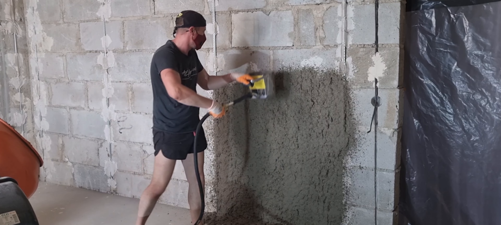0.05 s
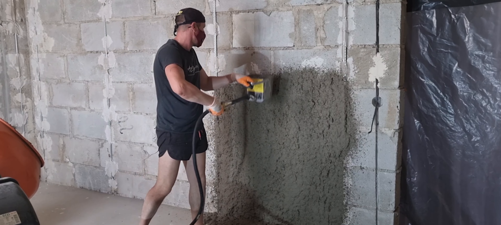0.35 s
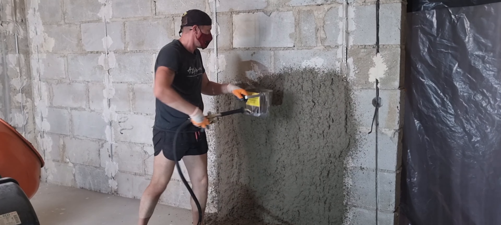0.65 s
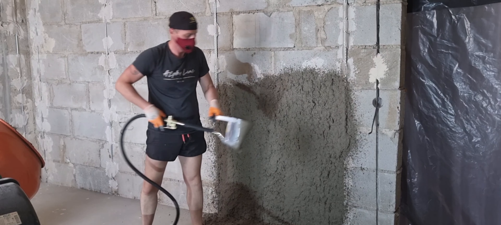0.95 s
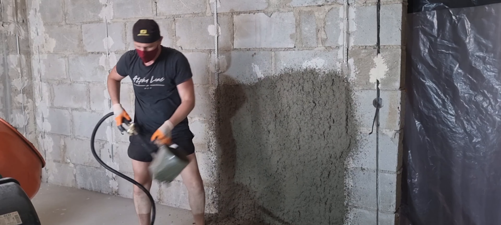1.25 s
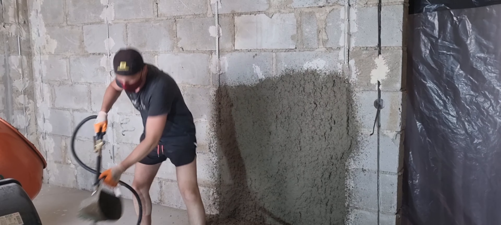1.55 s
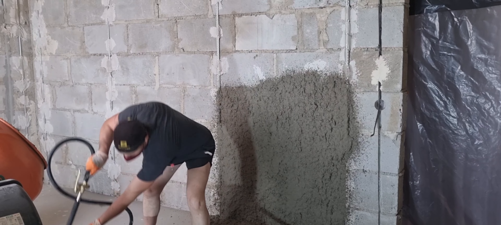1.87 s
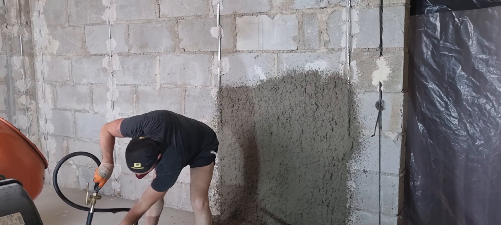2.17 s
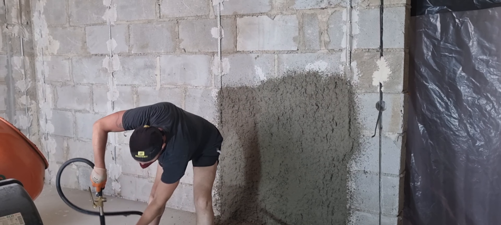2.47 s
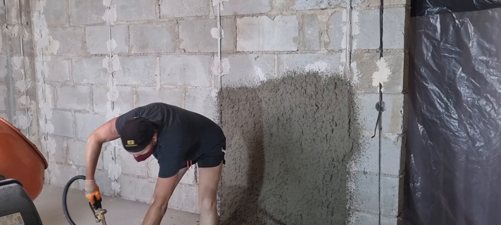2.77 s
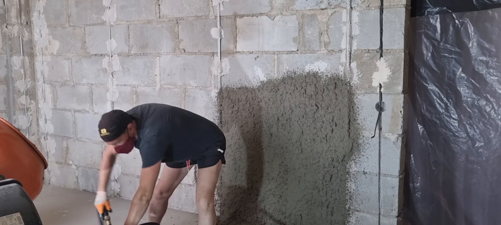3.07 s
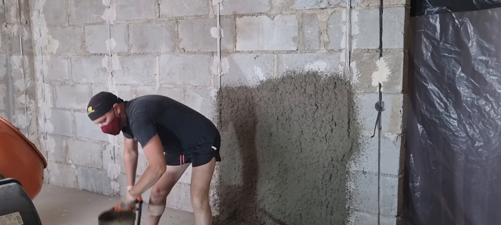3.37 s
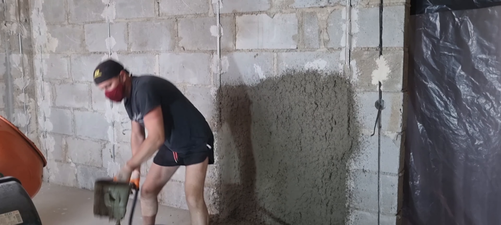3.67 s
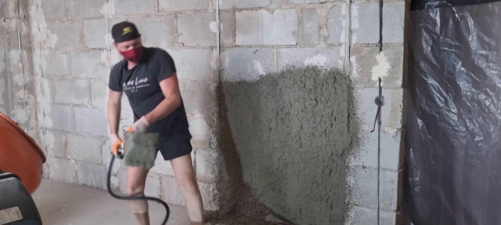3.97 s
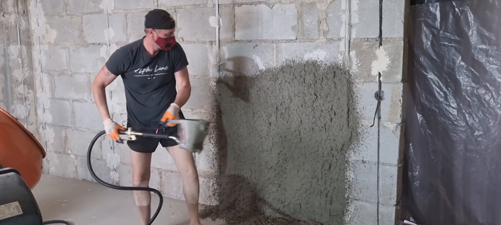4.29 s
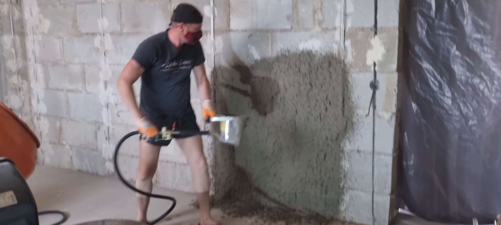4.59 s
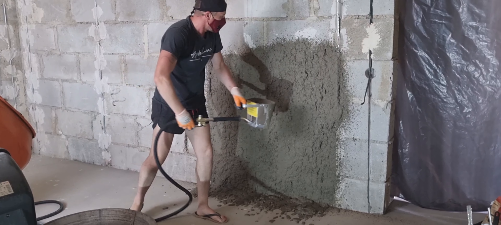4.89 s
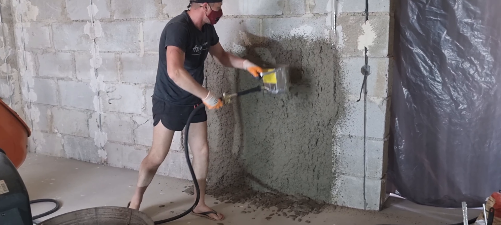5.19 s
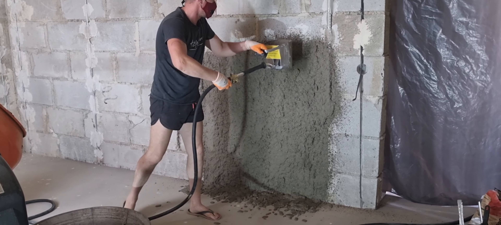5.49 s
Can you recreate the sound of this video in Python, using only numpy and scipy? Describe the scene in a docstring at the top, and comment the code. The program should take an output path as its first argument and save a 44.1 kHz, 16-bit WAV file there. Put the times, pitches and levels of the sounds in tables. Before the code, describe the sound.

In a bare, slightly echoing room, a plaster sprayer hisses loudly and dies away within a second. Faint scuffs lead into wet, sandy scraping and a few hollow knocks as the steel hopper is refilled from a tub. Shoes shuffle over grit and a hose fitting gives a bright clink. Then the spray bursts back, fuller and boomier than before. Everything sounds fairly near and a little louder on the left.

```python
"""A loud, sputtering hiss: an air-driven hopper gun sprays mortar on a block wall in a bare room.
The gun runs empty and is shut off. The worker scoops its steel hopper (the cup that holds the
mortar) through a tub, and wet sand grinds on the rim. The hopper comes out with a ringing knock,
fittings clink, shoes shuffle over the gritty floor, and the refilled gun starts again with a boom."""
import sys
import numpy as np
from scipy import signal
from scipy.fft import rfft, irfft
from scipy.io import wavfile

SR = 44100
rng = np.random.default_rng(int(sys.argv[2]) if len(sys.argv) > 2 else 0)


def store_wav(level_fs):
    """Save 16-bit WAV to argv[1]."""
    pcm = np.round(np.clip(np.atleast_2d(level_fs), -1, 1) * 32767)
    wavfile.write(sys.argv[1], SR, pcm.T.astype(np.int16))


N = 248724
TIME = np.arange(N) / SR

# the tones of the steel hopper: (pitch [Hz], level [dB], time to fade by 60 dB [s])
HOPPER_TONES = [(264, -8.5, 0.133), (393.6, -7.5, 0.121), (418.6, -3.5, 0.15), (473, -7, .13),
                (534.2, 1.5, 0.24), (669, 4.5, 0.038), (870, -11, .07), (1003, -5.5, 0.24),
                (1280, -2, 0.061), (1637, -4.5, 0.08), (2434, -22, 0.026)]


def gain_of(db):
    """Turns decibels into a number to multiply a sound by."""
    return 10 ** (np.asarray(db) / 20)


def evened(x):
    """Scales a signal to an average (rms) level of 1."""
    return x / np.sqrt(np.mean(x ** 2) + 1e-20)


def read(points, hz):
    """Looks up a frequency in a table, sliding between its rows."""
    row_hz, value = np.transpose(points)
    return np.interp(np.log(hz + 1), np.log(row_hz + 1), value)


def bins(x):
    """The frequencies in the spectrum of x."""
    return np.fft.rfftfreq(x.shape[-1], 1 / SR)


def colour(x, points):
    """Shapes the bass, middle and treble of x by a table, then evens its level."""
    return evened(irfft(rfft(x) * gain_of(read(points, bins(x))), x.shape[-1]))


def resonate(x, peaks):
    """Lets x ring in narrow bands: (pitch [Hz], width [Hz], level [dB])."""
    return sum(gain_of(db) * signal.lfilter(*signal.iirpeak(hz, hz / width, SR), x)
               for hz, width, db in peaks)


def noise():
    """A plain hiss in two channels."""
    return rng.standard_normal((2, N))


def drift(hz):
    """A smooth random wobble, up to about the given speed."""
    spectrum = rfft(rng.standard_normal(N))
    return evened(irfft(spectrum / (1 + (bins(TIME) / hz) ** 4), N))


def grains(per_s, spread_db):
    """Random clicks of uneven size, each shared unevenly between left and right."""
    size = gain_of(spread_db * np.minimum(rng.exponential(1, N), 3))
    happens = rng.random(N) < per_s / SR
    return evened(size * happens * rng.uniform(-1.15, 1, (2, N)))


def patchy(x, patch_db, span_hz, hold_s):
    """Makes patches of the spectrum swell and sink at random."""
    spectra = signal.stft(x, SR, nperseg=512)[2]
    patches = rng.standard_normal(spectra.shape)
    patches = patches + patches[::-1] * .5
    # smooth across frequency, then across time
    for axis, keep in ((1, np.exp(-SR / 512 / span_hz)), (2, np.exp(-256 / SR / hold_s))):
        patches = signal.filtfilt([1 - keep], [1, -keep], patches, axis=axis, padtype="even")
    spectra = spectra * gain_of(patch_db * evened(patches))
    return evened(signal.istft(spectra, SR, nperseg=512)[1][:, :N])


def after(s):
    """Seconds since a moment, zero before it."""
    return np.maximum(TIME - s, 0)


def gate(start, end, rise, fall):
    """On between two moments, fading in and out."""
    return np.clip((TIME - start) / rise, 0, 1) * np.clip((end - TIME) / fall, 0, 1)


def swell(s, rise, fade):
    """Grows smoothly to a peak at a moment, then fades."""
    return np.exp(-(np.maximum(s - TIME, 0) / rise) ** 2 - (after(s) / fade) ** 1.6)


def rub(s, rise, fade):
    """Starts at a moment, rises evenly and dies away."""
    return np.minimum(after(s) / rise, 1) * np.exp(-after(s + rise) / fade)


def add(mix, s, sound):
    """Mixes a sound in at a moment."""
    part = mix[:, round(s * SR):][:, :sound.shape[-1]]
    part += sound[:, :part.shape[-1]]


def ring(tones, detune=0.037):
    """A struck object: its tones start together and each fades at its own speed."""
    t, out = np.arange(SR // 2) / SR, 0
    for hz, db, fade_s in tones:
        pitch = hz * (1 + detune * rng.normal())
        cycles = pitch * t + rng.random((2, 1))  # left and right are out of step
        out = out + gain_of(db - 60 * t / fade_s) * np.sin(2 * np.pi * cycles)
    return out * np.minimum(t / 0.0029, 1)


def burst(opens, closes, runs_dry, boom_db):
    """Air pressure and the mortar left in the hopper set how loud each part of the spray is."""
    ease_s, shut_s, drain_s = 0.19, 0.067, 0.43  # valve eases off, then shuts; hopper drains
    valve = gate(opens, closes + ease_s + shut_s, rise=0.009, fall=shut_s)
    early = np.maximum(opens - TIME, 0)  # a little air escapes just before the valve opens
    leak = gain_of(-17) * np.exp(-early / .0065) + gain_of(-34) * np.exp(-early / 0.12)
    surge_db = 3.5 * np.exp(-after(opens) / 0.041)  # pressure stored in the hose gives a kick
    air = valve * gain_of(surge_db) + (TIME < opens) * leak
    pressure_db = -86.5 * after(closes)
    feed = valve * np.minimum(after(opens + 0.0057) / 0.042, 1)  # mortar arrives a moment later
    empty = np.minimum(after(runs_dry) / drain_s, 1)
    rush = air * gain_of(-17.5 + pressure_db - 1.5 * empty)
    treble = rush * gain_of(.5 * pressure_db)  # a slower jet sounds duller
    sizzle = air * gain_of(-20.5 + 2.5 * pressure_db + empty)
    sputter = feed * gain_of(-22 + pressure_db - 17 * empty)
    sputter = sputter / np.hypot(1, gain_of(boom_db))  # the boom takes its share
    hollow = feed * gain_of(-32 + 0.45 * pressure_db)  # sings on as the air dies away
    return np.array([rush, treble, sizzle, sputter, sputter * gain_of(boom_db), hollow])


def sprayer():
    """Air jets tear lumps off the mortar: rush and sizzle, low pops, and sand hitting the wall."""
    # bursts of the gun: (valve opens [s], starts to close [s], starts to run dry [s], boom [dB])
    bursts = [(-.05, 0.709, 0.18, -14), (5.185, 5.8, 6.0, 2.5)]
    # rushing air, sizzling nozzles and popping mortar, each: (frequency [Hz], level [dB])
    rush_shape = [(300, -35), (600, -13), (780, -9), (1020, -9.5), (1250, -0.5), (1550, -2), (1900, 1),
                  (2550, 0.5), (3900, 0), (5300, -3), (7100, -8.5), (10000, -26), (14000, -26)]
    sizzle_shape = [(5000, -46), (8000, -7.5), (10500, -8.5), (12200, -3), (14500, -0.5), (16000, -11)]
    pop_shape = [(25, -25.5), (48, -32.5), (65, -9), (85, -4), (100, -5.5), (125, -1), (180, -1), (290, 0),
                 (400, -2), (520, -7), (650, -17.5), (1200, -29), (3000, -47.5)]
    # ringing of the outlet, low boom of room and hopper, and air in the hopper,
    # each: (pitch [Hz], width [Hz], level [dB])
    outlet_peaks = [(1051, 130, 3.5), (2200, 57, -11), (2640, 89, -7), (2720, 190, -6.5), (2970, 42, -10.5),
                    (3920, 150, -10.5)]
    boom_peaks = [(72.8, 5, 14), (81, 7.1, 2.5), (113, 2.5, -1.5), (131.3, 9.1, 8), (203, 16, -3.5),
                  (361, 6.4, 4)]
    hollow_peaks = [(420, 14, -8.5), (478, 58, -1), (1025, 290, -6.5), (1320, 90, -2)]
    rush, treble, sizzle, sputter, boom, hollow = sum(burst(*row) for row in bursts)
    flutter_db = .5 * drift(hz=69.97)  # lumps passing the nozzles make the jet flutter
    jet = patchy(colour(noise(), rush_shape), patch_db=2.6, span_hz=168.8, hold_s=0.013)
    jet = jet * gain_of(flutter_db)
    jet = evened(jet + resonate(jet, outlet_peaks))
    splatter = colour(grains(per_s=1300, spread_db=-3), rush_shape)
    spray = gain_of(-0.65) * jet + gain_of(-7.5) * splatter
    dull = irfft(rfft(spray) / (1 + (bins(spray) / 3500) ** 4), N)  # the part below 3500 Hz
    hiss = patchy(colour(noise(), sizzle_shape), patch_db=2.5, span_hz=310.6, hold_s=0.0093)
    hiss = hiss * gain_of(1.7 * drift(hz=45) + flutter_db)
    pops = colour(grains(per_s=1200, spread_db=-1.5), pop_shape)
    mortar = gain_of(-1.5) * sputter * pops + boom * resonate(pops, boom_peaks)
    hopper_air = evened(resonate(resonate(noise(), hollow_peaks), [(477, 440, 0)]))
    return rush * dull + treble * (spray - dull) + sizzle * hiss + mortar + hollow * hopper_air


def background():
    """Low room noise, with a faint wavering hum on top."""
    # the quiet room: (frequency [Hz], level [dB])
    air_shape = [(25, -12), (60, -3.5), (120, -5), (200, -9), (290, -12.5), (390, -20.5), (510, -13),
                 (800, -23.5), (1300, -22.5), (2600, -24), (4500, -29.5), (7000, -44), (10000, -45),
                 (16000, -47.5)]
    # the path of the hum: (time [s], pitch [Hz], level [dB])
    hum_path = [(1, 90.4, -65), (1.5, 103.4, -62.5), (3.1, 100.6, -68.5), (3.4, 100.5, -55),
                (3.75, 120.7, -60.5), (4.05, 121.2, -55), (4.35, 100, -63)]
    s, hz, db = np.transpose(hum_path)
    phase = 2 * np.pi * np.cumsum(np.interp(TIME, s, hz)) / SR
    hum = np.sin(phase) * gain_of(np.interp(TIME, s, db))
    air = gain_of(-59) * colour(noise(), air_shape) * gain_of(.8 * drift(hz=8.4))
    return air + hum * np.array([[1], [0]])  # stereo() puts this channel in the middle


def scuffs():
    """Grit rolls under a shoe or over steel; longer scuffs swell and fade more slowly."""
    # gritty rubs: (time [s], level [dB], length [s], steel ring [dB])
    rubs = [(1.147, -55.5, 0.026, -7), (1.377, -66, 0.05, 6), (1.68, -50, 0.033, 7), (1.768, -55, 0.029, 7),
            (1.843, -57.5, 0.03, 4), (2.001, -58.5, 0.11, -6), (3.399, -62, 0.011, 16),
            (3.59, -50, 0.038, -4.5), (3.906, -50.5, 0.075, 4.5), (3.952, -39, .026, -6),
            (3.988, -41, 0.019, 1), (4.146, -47.5, .025, -7), (4.593, -41, 0.048, 2),
            (4.678, -48, 0.045, -12), (4.834, -37.5, 0.079, -13), (4.957, -44.5, 0.014, -12)]
    # crunching grit: (frequency [Hz], level [dB])
    grit_shape = [(150, -5.5), (500, -9.5), (800, -13), (1300, -5), (2200, -1.5), (4000, 2.5), (6000, -6.5),
                  (9000, -15), (13000, -16), (16000, -16)]
    # ringing of rubbed steel: (pitch [Hz], width [Hz], level [dB])
    steel_peaks = [(2060, 310, -0.5), (2620, 160, 1)]
    grit = colour(grains(per_s=5600, spread_db=2.5), grit_shape)
    steel = resonate(grit, steel_peaks)
    return sum(gain_of(db) * rub(s, 0.45 * length, 0.72 * length) * (grit + gain_of(ring_db) * steel)
               for s, db, length, ring_db in rubs)


def clinks():
    """Valve and hose fittings tap together and chatter for an instant."""
    # taps of metal on metal: (time [s], level [dB])
    taps = [(1.283, -57), (3.575, -47), (4.421, -34.5)]
    # the tones of the brass fittings: (pitch [Hz], level [dB], time to fade by 60 dB [s])
    brass_tones = [(2900, 0.5, .11), (3630, -0.5, 0.069), (4200, 1.5, .11), (4480, 4.5, 0.085),
                   (4720, -5, 0.14), (5400, -12, .1), (6000, -25, .08), (8690, -14, 0.26), (8800, -22, .17),
                   (12820, -10, .1), (13350, -14, .09)]
    out, t = np.zeros((2, N)), TIME[:SR // 15]
    for s, db in taps:
        chatter = rng.standard_normal((2, len(t))) * np.exp(-t / 0.015) * np.minimum(t / 0.013, 1)
        buzz = resonate(chatter, [(hz, 450, tone_db) for hz, tone_db, _ in brass_tones])
        add(out, s, gain_of(db - 8.5) * ring(brass_tones, detune=0))
        add(out, s, gain_of(db + 2.5) * buzz)
    return out


def bumps():
    """Soft, heavy bumps of hose and tub: two low tones that die away."""
    # dull thuds: (time [s], level [dB], pitch [Hz], time to fade by 60 dB [s])
    thuds = [(1.72, -44.5, 63.5, .3), (2.095, -28.5, 72.9, 0.093), (2.424, -21.5, 147, 0.17),
             (2.427, -11, 293.3, 0.071), (2.464, -27.5, 208, 0.12), (2.798, -39, 143.2, 0.9),
             (3.033, -31, 303, .059), (3.086, -25.5, 431.7, 0.16), (3.351, -37.5, 375, 0.046),
             (4.82, -38.5, 420, 0.041)]
    out = np.zeros((2, N))
    for s, db, hz, fade_s in thuds:
        add(out, s, gain_of(db) * ring([(hz, 0, fade_s), (hz * 1.5, -6, fade_s / 2)]))
    return out


def scoop():
    """The steel rim grinds through wet sand, rings the hopper and shakes the tub."""
    # pushes through the tub: (peak time [s], rise [s], fade [s], scrape [dB], sand [dB], rumble [dB])
    strokes = [ (2.101, 0.016, 0.059, -33, -49.5, -37), (2.291, 0.077, 0.072, -26.5, -48.5, -37),
               (2.431, 0.019, 0.041, -28, -52.5, -27), (2.52, 0.13, 0.16, -29.5, -41, -36.5),
               (2.66, 0.093, 0.1, -20.5, -32.5, -39), (2.85, 0.058, 0.052, -31, -39.5, -40),
               (2.948, 0.015, 0.15, -32, -40, -45), (3.08, 0.016, .045, -25.5, -49, -37), ]
    # scraping steel, fine sand and rumbling tub, each: (frequency [Hz], level [dB])
    scrape_shape = [(200, -28), (420, -7), (620, -10.5), (780, -2), (1000, -2.5), (1280, 3), (1550, -2),
                    (1830, 0.5), (2700, -2.5), (3300, -6.5), (4800, -12), (6850, -28), (9000, -27.5),
                    (13000, -51)]
    sand_shape = [(3500, -20), (6000, -1), (9500, -9.5), (13000, 0.5), (16000, 3)]
    tub_shape = [(45, -23), (90, -9), (145, -5.5), (190, -5.5), (250, -2.5), (420, -1), (700, -16),
                 (1500, -37)]
    # air ringing in the dragged hopper: (pitch [Hz], width [Hz], level [dB])
    air_peaks = [(664, 120, -2.5), (1040, 180, -6)]
    # the rim catches and rasps: (time [s], level [dB])
    catches = [(1.775, -53), (1.835, -55.5), (2.712, -30.5)]
    enters_s, leaves_s = 2.083, 3.147
    power = sum((gain_of(levels)[:, None] * swell(s, rise, fade)) ** 2
                for s, rise, fade, *levels in strokes)
    scrape, sand, rumble = np.sqrt(power)
    slips = gain_of(drift(hz=56))
    grind = colour(grains(per_s=3000, spread_db=0), scrape_shape)
    grind = patchy(grind, patch_db=1.5, span_hz=108.6, hold_s=0.015)
    steel = resonate(grind, [(hz, 50, 0) for hz, _, _ in HOPPER_TONES])
    grind = evened(grind + gain_of(-10.5) * steel)
    hollow = gain_of(6.5 - 14.5 * after(enters_s)) * resonate(grind, air_peaks)  # fades as it fills
    fine = colour(grains(per_s=6000, spread_db=2), sand_shape)
    tub = colour(grains(per_s=1300, spread_db=1.6), tub_shape)
    digging = gain_of(-.7) * scrape * (grind + hollow) + sand * fine + rumble * tub
    in_tub = gate(enters_s, leaves_s, rise=0.0077, fall=0.099)
    catch = sum(gain_of(db) * rub(s, rise=.016, fade=0.029) for s, db in catches)
    rasp = evened(grind + gain_of(1.5) * resonate(grind, [(1350, 180, 0)]))
    return slips * (in_tub * digging + catch * rasp)


def knocks():
    """A short crack, then the ring of the steel hopper, cut short by its load."""
    # blows on the hopper: (time [s], ring [dB], crack [dB])
    blows = [(2.087, -44, -47), (2.42, -32, -23), (2.949, -51, -30), (3.077, -32.5, -24.5),
             (3.105, -37.5, -36), (4.159, -37, -27.5)]
    # the crack of a blow: (frequency [Hz], level [dB])
    crack_shape = [(200, -2), (500, 1.5), (750, 5), (1200, 0), (2500, 0.5), (4500, -7.5), (8000, -29),
                   (16000, -23)]
    out, crack = np.zeros((2, N)), colour(noise(), crack_shape)
    for s, ring_db, crack_db in blows:
        add(out, s, gain_of(ring_db) * ring(HOPPER_TONES, detune=.012))
        out += gain_of(crack_db) * crack * np.minimum(after(s) / 0.0079, 1) * np.exp(-after(s) / 0.01)
    return out


def room(x):
    """Bare walls send back many small echoes, whose paths change as the worker moves."""
    # how long the room rings: (frequency [Hz], time to fade by 60 dB [s])
    fade_times = [(100, 0.44), (400, 0.5), (1000, 0.49), (3000, 0.36), (6000, 0.3), (13000, 0.24)]
    size, echoes_per_s, out = SR * 3 // 4, 3000, 0
    signs = rng.choice([-1., 1.], (3, 2, size))
    echoes = signs * (rng.random(signs.shape) < echoes_per_s / SR) * (TIME[:size] > .004)
    hz, t, spectra = signal.stft(echoes, SR, nperseg=256)
    fade = gain_of(-60 * t / read(fade_times, hz)[:, None])
    tails = signal.istft(spectra * fade, SR, nperseg=256)[1]
    for k, tail in enumerate(tails):
        share = np.sqrt(2 / 3) * np.cos(2 * np.pi * (2 * TIME + k / 3))  # three echo sets take turns
        out = out + signal.fftconvolve(x * share, tail / np.linalg.norm(tail[0]), axes=1)[:, :N]
    return out


def stereo(x):
    """Two listening points a hand apart share the bass but partly oppose in the middle range."""
    # how alike left and right are: (frequency [Hz], likeness [-1 opposite to 1 same])
    likeness = [(50, 0.96), (250, 0.93), (450, 0.022), (800, -0.13), (1500, -.5), (2600, 0.043),
                (3400, -.2), (4100, -0.031), (7000, 0), (9000, 0.3), (12000, 0.61), (16000, 0.21)]
    first, second = rfft(x)
    alike = read(likeness, bins(x))
    mid = first * np.sqrt((1 + alike) / 2)
    side = second * np.sqrt((1 - alike) / 2)
    return irfft(np.array([mid + side, mid - side]), x.shape[-1])


def scene():
    """All the sounds and their echoes together, louder on the left."""
    spray, scraping = sprayer(), scoop()
    handling = gain_of(-2) * (bumps() + knocks() + clinks() + scuffs())
    echoes = room(gain_of(-7) * spray + gain_of(-5) * scraping + gain_of(-1.5) * handling)
    return stereo(spray + scraping + handling + echoes + background()) * gain_of([[1.6], [.9]])


def record(dry):
    """Cuts off the very highest treble, above 16050 Hz."""
    low_pass = signal.firwin(511, 16050, window=("kaiser", 9), fs=SR)
    return signal.oaconvolve(dry, low_pass[None], "same")


dry = scene()
out = record(dry)
store_wav(out)
```